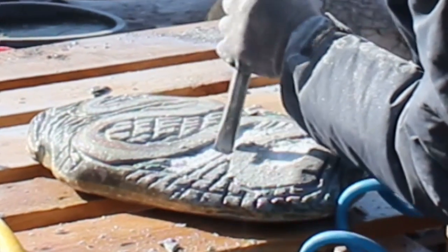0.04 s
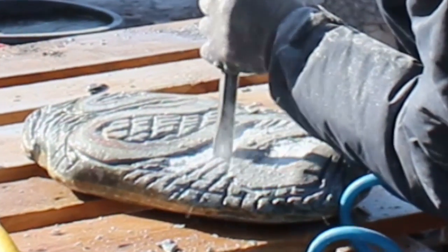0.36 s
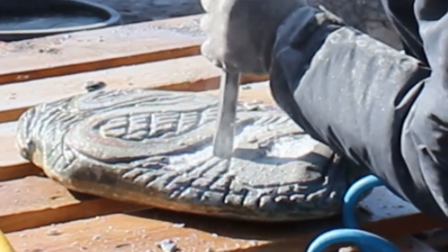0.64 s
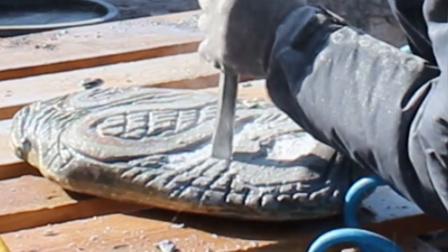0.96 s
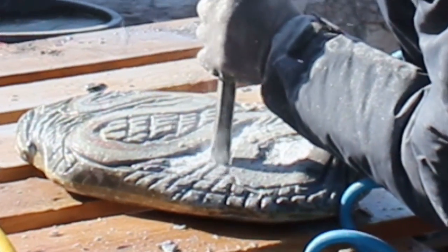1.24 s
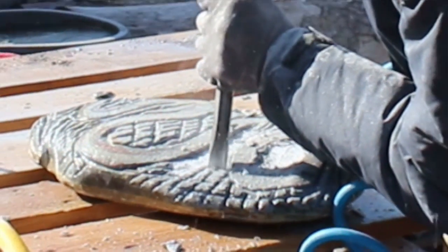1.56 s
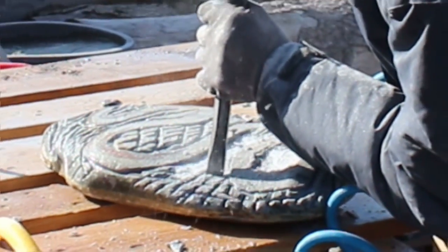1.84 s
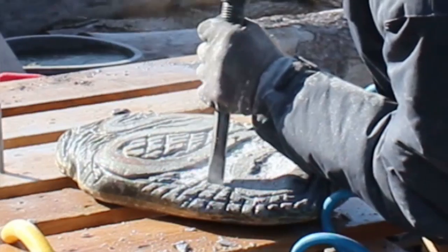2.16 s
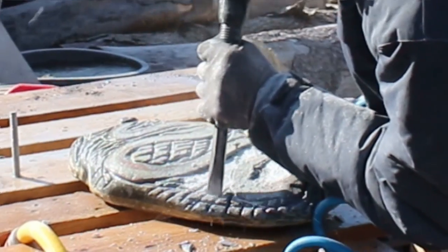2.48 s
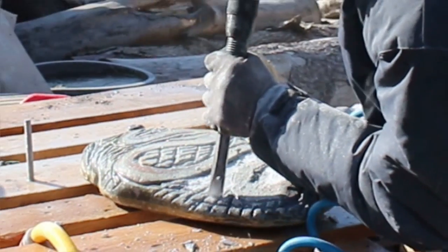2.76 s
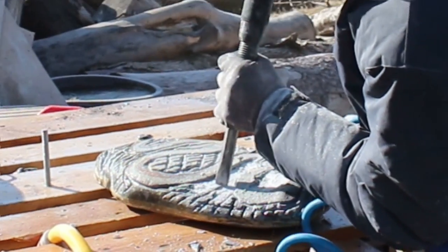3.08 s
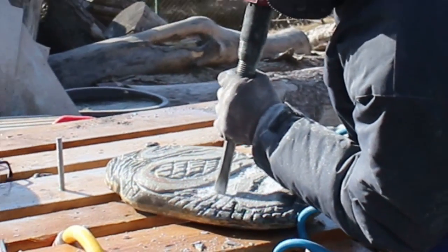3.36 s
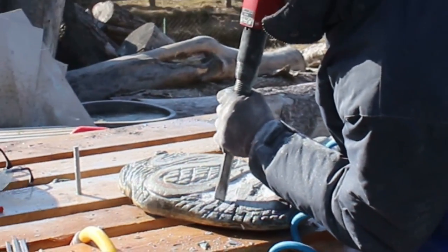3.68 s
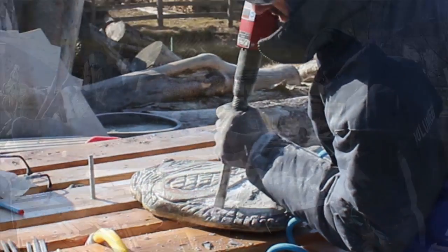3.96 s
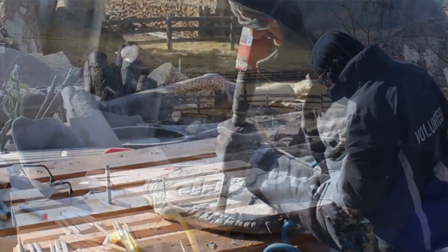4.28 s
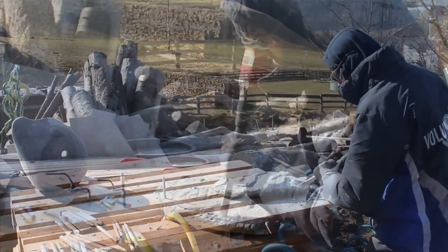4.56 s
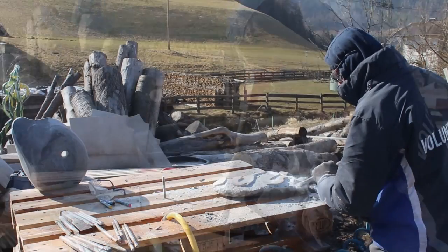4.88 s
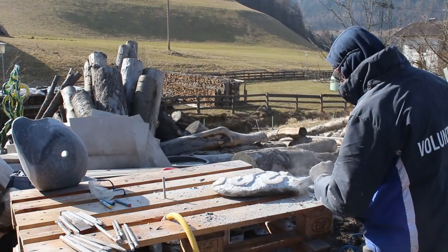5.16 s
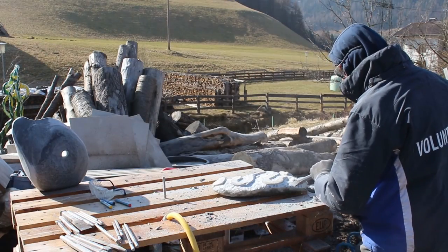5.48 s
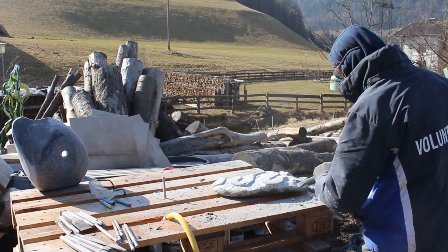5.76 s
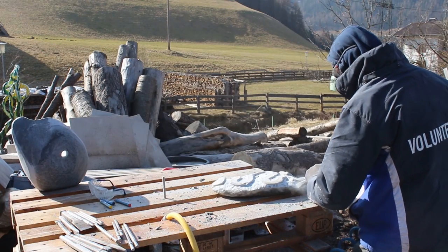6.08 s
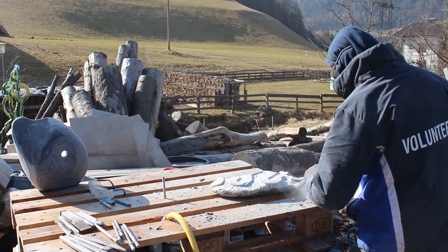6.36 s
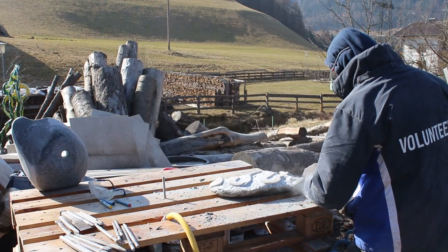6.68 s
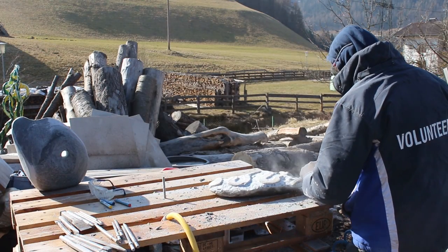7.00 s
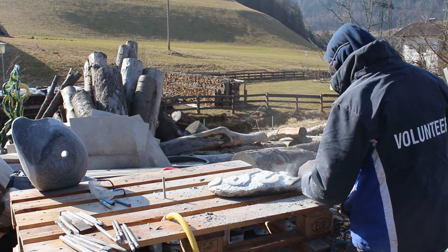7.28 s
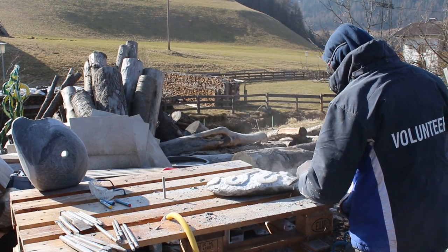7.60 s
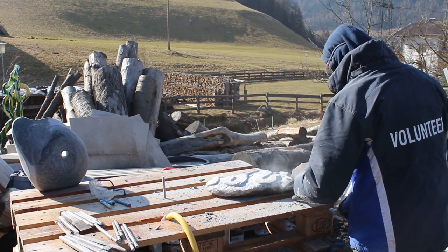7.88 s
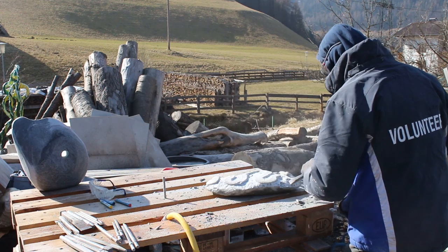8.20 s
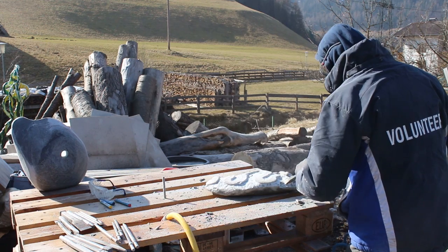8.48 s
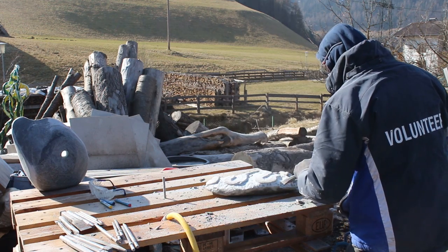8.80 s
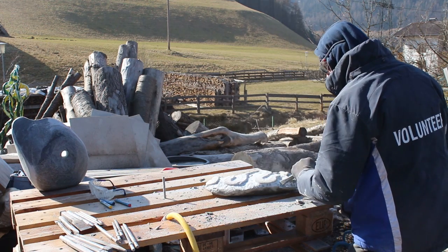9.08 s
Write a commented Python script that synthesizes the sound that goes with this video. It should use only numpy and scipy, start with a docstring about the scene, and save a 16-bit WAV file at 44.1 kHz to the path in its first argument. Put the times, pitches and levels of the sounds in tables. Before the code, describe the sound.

A pneumatic chisel hammers stone outdoors in a loud, rapid chatter, gritty with a metallic ring. Two long, crisp bursts sound close to the microphone while a compressor chugs faintly behind. The sound then blends into the same work heard from a little further off, with softer-edged bursts of different lengths. Small pops, air hisses, light ticks and faint wind on the microphone fill the short pauses.

```python
"""Carving stone with a pneumatic hammer

A sculptor works a stone on a pallet outdoors, close by at first, then from further off. Each piston
stroke puffs out a low thud, drives the ringing chisel into the stone a few ms later and vents again on
its way back. A compressor chugs behind the close spell; wind and small ticks fill the later pauses."""
import sys
import numpy as np
from scipy import signal
from scipy.fft import rfft, irfft, next_fast_len
from scipy.io import wavfile
from scipy.ndimage import uniform_filter1d

SR = 44100
rng = np.random.default_rng(int(sys.argv[2]) if len(sys.argv) > 2 else 0)


def put_to_file(sound):
    """Save the sound as 16-bit audio at rate SR, in the file named by the first command-line argument."""
    columns = np.atleast_2d(sound).T  # one column per channel
    safe = np.clip(columns, -1, 1)
    whole_steps = np.round(safe * 32767)
    wavfile.write(sys.argv[1], SR, whole_steps.astype(np.int16))


N = 403074
T = np.arange(N) / SR
AGE = np.arange(int(.1 * SR)) / SR  # time since a blow [s]
AGE_MS = AGE * 1000


def undb(db):
    """Decibels to gain."""
    return 10 ** (np.asarray(db) / 20)


def unit(x):
    """Scale to rms 1."""
    return x / np.sqrt(np.mean(x ** 2))


def per_stroke(sound):
    """Scale one stroke so that 25 of them a second have rms 1."""
    return sound * np.sqrt(SR / 25 / np.sum(np.abs(sound) ** 2))


def fader(rows):
    """A gain that rides through (time [s], level [dB]) points."""
    return undb(np.interp(T, *np.transpose(rows)))


def swell(s, db, rise_s, decay_s):
    """A gain that climbs to a peak at time s and dies away."""
    return undb(db) * np.exp(-np.maximum((s - T) / rise_s, (T - s) / decay_s))


def drift(rate):
    """A random wander of rms 1, turning about rate times a second."""
    hold = int(SR / rate)
    steps = np.repeat(rng.standard_normal(N // hold + 1), hold)
    return unit(uniform_filter1d(steps, hold)[:N])


def add(out, s, sound):
    """Mix a sound in at time s."""
    start = max(int(s * SR), 0)
    part = out[..., start:start + sound.shape[-1]]
    part += sound[..., :part.shape[-1]]


def band(x, low_hz, high_hz, order=3):
    """High-pass and low-pass in series."""
    high_pass = signal.butter(order, low_hz, "high", fs=SR, output="sos")
    low_pass = signal.butter(order, high_hz, fs=SR, output="sos")
    return signal.sosfilt(np.vstack([high_pass, low_pass]), x)


def eq_curve(colour, hz):
    """Gains at hz of a (frequency [Hz], level [dB]) colour."""
    points_hz, db = np.transpose(colour)
    return undb(np.interp(np.log(hz), np.log(points_hz), db))


def noise(colour, width=None):
    """Coloured stereo noise; width is the side gain, by default narrow in the bass and wider on top."""
    size = next_fast_len(N)
    hz = np.maximum(np.fft.rfftfreq(size, 1 / SR), 1)
    if width is None:
        width = 0.64 * np.minimum(hz / 4500, 1) ** 0.38
    roll_off = np.minimum(hz / colour[0][0], 1) ** 2 * np.minimum(colour[-1][0] / hz, 1) ** 4
    gain = eq_curve(colour, hz) * roll_off
    white = rfft(rng.standard_normal((2, size)))
    mid, side = irfft(white * [gain, gain * width], size)[:, :N]
    return np.array([mid + side, mid - side]) / mid.std()


def ring(times, gains, modes, width, scatter_db=2.5, wander_rad=0.8, rise_ms=0.87, bend_hz=0):
    """Modes struck anew by every blow; the contact varies their level and phase and can bend the pitch."""
    hz, t60, db = np.transpose(modes)[:, :, None]
    attack = 1 - np.exp(-AGE_MS / rise_ms)
    partials = undb(db) * np.exp((2j * np.pi * hz - np.log(1000) / t60) * AGE) * attack
    partials = per_stroke(partials) * np.sqrt(2)
    out = np.zeros((2, N))
    chance = rng.standard_normal((len(times), 3, len(modes)))
    for s, gain, bend, (size, wander, side) in zip(times, gains, bend_hz + 0 * times, chance):
        phase = wander_rad * wander + width * side * np.array([[1], [-1]])
        weights = gain * undb(scatter_db * size) * np.exp(1j * phase)
        add(out, s, (weights @ partials * np.exp(2j * np.pi * bend * AGE)).real)
    return out


def knocks(events, modes):
    """Single (time [s], level [dB]) blows on one set of modes."""
    times, db = np.transpose(events)
    return ring(times, undb(db), modes, width=.2, scatter_db=2.0, wander_rad=0.23)


def clack(times, gains, colour, decay_ms, rise_ms):
    """Crowded, heavily damped modes of a struck body: the same dry knock on every blow."""
    envelope = (1 - np.exp(-AGE_MS / rise_ms)) ** 2 * np.exp(-AGE_MS / decay_ms)
    knock = per_stroke(noise(colour)[:, :len(AGE)] * envelope) * np.sqrt(2)
    hits = np.bincount((times * SR).astype(int), gains, N)
    return signal.fftconvolve(hits[None, :N], knock, axes=1)[:, :N]


# The airy bed of the valley (frequency [Hz], level [dB])
VALLEY_COLOUR = [(100, -5.5), (400, -3), (800, -2.5), (1500, -9.5), (3000, -15.5), (6000, -26),
                 (10000, -38.5), (16000, -42.5)]


def valley():
    """The open valley lays a faint, steady hush under everything."""
    return undb(-54.5) * noise(VALLEY_COLOUR, width=0.57)


# The breeze and its short buffets (time [s], level [dB])
BREEZE = [(4.0, -55), (4.5, -52), (5.3, -50), (5.9, -49.5), (6.2, -44), (8.0, -55.5), (8.3, -45.5),
          (8.8, -48.5)]
BUFFETS = [(4.53, -39), (5.62, -46.5), (5.77, -47), (5.94, -45), (8.36, -40), (8.476, -39), (8.67, -41.5)]
# Their low rumble (frequency [Hz], level [dB])
WIND_COLOUR = [(12, -50.5), (20, -32.5), (57, -8.5), (128, -2), (147, -8), (162, -4.5), (203, -9.5),
               (400, -26.5), (520, -51), (880, -120)]


def wind(buffet_s=0.025):
    """Wind on the microphone: a wide rumble with quick bumps."""
    buffets = sum(swell(s, db, buffet_s, buffet_s) for s, db in BUFFETS)
    return (fader(BREEZE) + buffets) * noise(WIND_COLOUR, width=1.5)


# The dull tone of the yard's tail (frequency [Hz], level [dB])
YARD_COLOUR = [(130, 11), (500, 6.5), (1500, 7.0), (5000, 6.0), (14000, -68.5)]


def yard(x, t60=0.26, wet_db=-16.0, build_s=0.0051):
    """Wood piles and sheds scatter back a thin, short reverb."""
    t = T[:SR]
    tail = noise(YARD_COLOUR)[:, :SR] * undb(-60 * t / t60) * (1 - np.exp(-t / build_s))
    tail /= np.sqrt(np.sum(tail[0] ** 2))
    return undb(wet_db) * signal.fftconvolve(x, tail, axes=1)[:, :N]


# The compressor's fader ride (time [s], level [dB])
COMPRESSOR_RIDE = [(0, -27.5), (.2, -26), (.32, -30.5), (1.3, -35.5), (2.7, -36), (2.95, -33.5),
                   (3.2, -30.5), (3.35, -30.5), (4.0, -36.5), (4.8, -40.5), (5.2, -100)]
# Its rushing air, its boxy knock and the tones of its squeak (frequency [Hz], level [dB])
RUSH_COLOUR = [(24, -60), (40, -27), (75, -23.5), (107, -32.5), (139, -19), (202, -3), (309, -6.5),
               (890, -4), (1400, -14.5), (2560, -23.5), (3240, -17), (3910, -30), (4300, -29),
               (6870, -36.5), (8600, -34), (11000, -70), (14300, -119)]
HOUSING_COLOUR = [(120, -41), (160, 0), (210, 4), (310, -8), (640, -9), (860, -4), (1000, -11),
                  (1300, -19.5), (2200, -27)]
SQUEAKS = [(3220, -11), (1756, -13), (1545, -16.5), (4130, -21), (4441, -27), (8340, -20.5)]


def compressor(crank_hz=17.62, first_s=.0245, waver_hz=15, flutter_db=1.8):
    """Two pistons chug on each turn of the crank: the housing knocks, air rushes, a squeak wavers."""
    turns = (T - first_s) * crank_hz
    crank_phase, piston_phase = turns % 1, 2 * turns % 1
    beat_s = .5 / crank_hz
    beats = np.arange(first_s % beat_s, T[-1], beat_s)
    late, size = rng.standard_normal((len(beats), 2)).T
    housing = clack(beats + .0004 * late, undb(0.93 * size), HOUSING_COLOUR, decay_ms=13.5, rise_ms=2.7)
    chug = unit(0.5 + 1.2 * (1 - np.exp(-piston_phase / 0.064)) * np.exp(-piston_phase / 0.13))
    once_a_turn = unit(0.5 + np.exp(-crank_phase / .7) * (1 - np.exp(-crank_phase / 0.078)))
    tones = np.zeros(N)
    for hz, db in SQUEAKS:
        gain = undb(db + flutter_db * drift(45))
        pitch_hz = hz + waver_hz * (drift(14) + drift(160))
        tones += gain * np.sin(2 * np.pi * np.cumsum(pitch_hz) / SR)
    squeak = once_a_turn * unit(tones)
    rush = chug * noise(RUSH_COLOUR)
    return fader(COMPRESSOR_RIDE) * (undb(-1.5) * unit(housing) + undb(-4.0) * rush + undb(-16.5) * squeak)


# Little breaths of air (time [s], level [dB], rise [s], decay [s])
LEAKS = [(5.5, -52, .004, 0.12), (5.99, -40, 0.019, .01), (8.1, -45, .02, 0.054),
         (8.775, -40, 0.0097, 0.017)]
# Their hiss (frequency [Hz], level [dB])
LEAK_COLOUR = [(300, -2), (1000, 3), (2100, 2), (4000, 3), (5500, 5), (9000, 3), (12000, -16.5),
               (16000, -27)]


def valve_leaks():
    """Air slips past the half-open valve as the trigger moves."""
    return sum(swell(*leak) for leak in LEAKS) * noise(LEAK_COLOUR)


# Light ticks in the pauses (time [s], level [dB])
TOUCHES = [(5.698, -52), (8.434, -50.5)]
# What they set ringing (frequency [Hz], t60 [s], level [dB])
TOUCH_MODES = [(557, .05, 2), (1050, 0.023, 2), (2240, 0.075, -5), (3370, .02, -6)]


def chisel_touches():
    """The chisel tip ticks as it is set down on the stone."""
    return knocks(TOUCHES, TOUCH_MODES)


# Hollow pops (time [s], level [dB])
POPS = [(4.5015, -31.5), (4.566, -35), (4.6268, -33), (5.9708, -36), (8.7961, -28.5), (9.112, -44)]
# The barrel's resonances (frequency [Hz], t60 [s], level [dB])
BARREL_MODES = [(560, 0.051, 0), (665, 0.057, 6), (835, 0.029, -18)]


def barrel_pops():
    """The barrel pops as the piston starts to move."""
    return knocks(POPS, BARREL_MODES)


# Short, bright rasps (time [s], centre [Hz], level [dB])
SCRAPES = [(5.392, 7000, -34), (5.432, 5800, -27), (5.439, 5500, -25), (7.868, 8600, -27.5),
           (8.013, 8800, -27), (8.881, 9000, -27), (8.893, 8430, -36), (8.952, 8700, -31),
           (9.027, 8400, -29.5), (9.039, 8600, -36)]


def scrapes(rise_s=0.00082, decay_s=0.0076, edge_ratio=1.2):
    """The tip skids and flakes the stone: a flick of band-passed noise."""
    out = np.zeros((2, N))
    envelope = 2 * (1 - np.exp(-AGE / rise_s)) * np.exp(-AGE / decay_s)
    for s, hz, db in SCRAPES:
        rasp = band(rng.standard_normal((2, len(AGE))), hz / edge_ratio, hz * edge_ratio, order=2)
        add(out, s, undb(db) * unit(rasp) * envelope)
    return out


def thuds(times, gains, echoes, low_hz, high_hz, scatter_db=1.46, lead_ms=0.73):
    """The exhaust puff, one fast swing of pressure, with near reflections that vary as the tool shakes."""
    lag_ms, path_gain = np.vstack([(0, 1), echoes]).T
    lags = np.abs(lag_ms * SR / 1000).astype(int)
    swing = -band(signal.unit_impulse(len(AGE)), low_hz, high_hz)
    one_thud = signal.fftconvolve(np.bincount(lags, path_gain), swing)
    shake_db = scatter_db * rng.standard_normal((len(times), len(lags))) * np.minimum(lag_ms / 4, 1)
    sizes = gains[:, None] * path_gain * undb(shake_db)
    arrivals = ((times - lead_ms / 1000) * SR).astype(int)[:, None] + lags
    puffs = np.bincount(arrivals.ravel(), sizes.ravel(), N)[:N]
    return signal.fftconvolve(puffs, swing)[:N] * per_stroke(one_thud).max() / one_thud.max()


def grit(times, gains, bursts, colour, scatter_db, grain_db=3, jitter_ms=.12):
    """Bursts of air and crushed stone, grainy and each a little different from stroke to stroke."""
    power = np.zeros(N)
    envelopes = np.array([undb(db) * (1 - np.exp(-AGE_MS / rise)) * np.exp(-AGE_MS / decay)
                          for _, rise, decay, db in bursts])
    for (delay_ms, *_), envelope in zip(bursts, per_stroke(envelopes)):
        for s, gain, (size, late) in zip(times, gains, rng.standard_normal((len(times), 2))):
            onset = s + (delay_ms + jitter_ms * late) / 1000
            add(power, onset, (gain * undb(scatter_db * size) * envelope) ** 2)
    roughness = unit(uniform_filter1d(rng.standard_normal(N), size=48))
    return np.sqrt(power) * unit(undb(grain_db * roughness)) * noise(colour)


# The hard edge of the transient (frequency [Hz], level [dB])
SNAP_COLOUR = [(400, -27), (1200, -8.5), (1700, 0), (2500, -1.5), (3200, -13), (3900, -11), (4700, -2),
               (5400, -7), (7000, -22), (12000, -29)]


def snap(times, gains, size=512):
    """The bare click of steel on stone, the same on every blow."""
    hz = np.maximum(np.fft.rfftfreq(size, 1 / SR), 1)
    cepstrum = irfft(np.log(eq_curve(SNAP_COLOUR, hz)))
    click = irfft(np.exp(rfft(2 * cepstrum[:size // 2], size)))  # minimum phase keeps the attack tight
    hits = np.bincount((times * SR).astype(int), gains, N)
    return signal.fftconvolve(hits, per_stroke(click))[:N]


# A stroke has five layers: thud, grit, chisel ring, stone ring, chisel ping.
# Variation from stroke to stroke (scatter [dB] per layer)
STROKE_SCATTER_DB = (0.22, 0.15, 1.2, 0.99, 0.64)
# Accents where a chip breaks off (time [s], extra grit [dB])
CHIPS = [(.385, 1.5), (1.713, -3), (3.47, 2), (3.594, 2), (3.677, -1), (3.8, 3), (8.012, 3.5), (8.879, 2.5),
         (8.95, 0)]
# The stone gives way (time [s]), with more grit and less ring (offset [dB] per layer)
CRUMBLES = [5.317, 5.39, 5.426, 5.466, 7.865, 8.05, 8.95, 9.023]
CRUMBLE_DB = (-1, 1, -3, -6.5, -8)
# Trims on a loose blow's ring level (chisel ring [dB], stone ring [dB], chisel ping [dB])
LOOSE_RING_DB = (-4.5, -2, -7.5)


def strokes(pulls, surge, balance_db, seat, seat_share, loose, window_s=.015):
    """Rows of (time, five layer gains): the hose's surge sags after each pull, the seat sets the ring."""
    surge_db, surge_s, kick_db, kick_s = surge
    rows = []
    for force_db, drift_db, extra_db, tempo, last in pulls:
        ends = [s for s, _ in tempo[1:]] + [last]
        runs = [np.linspace(s, end, max(round((end - s) * rate), 1), endpoint=False)
                for (s, rate), end in zip(tempo, ends)]
        times = np.concatenate(runs + [[last]])
        age = times - times[0]
        boost_db = surge_db * np.exp(-age / surge_s) + kick_db * np.exp(-age / kick_s)
        db = (force_db + drift_db * age + boost_db)[:, None] + balance_db
        db += np.outer(np.interp(times, *np.transpose(seat)), seat_share)
        crumbling = np.abs(times[:, None] - CRUMBLES).min(axis=1) < window_s
        db += np.outer(crumbling, CRUMBLE_DB)
        db[:, -2:] += extra_db  # stone ring and chisel ping
        db[:, 1] += sum(chip_db * (np.abs(times - s) < window_s) for s, chip_db in CHIPS)
        db += STROKE_SCATTER_DB * rng.standard_normal(db.shape)
        rows += list(np.column_stack([times, undb(db)]))
    for s, thud_db, grit_db, ring_db in loose:
        rows.append([s, undb(thud_db), undb(grit_db), *undb(ring_db + np.array(LOOSE_RING_DB))])
    return np.array(rows)


# One sharp crack as the edge bites (delay [ms], rise [ms], decay [ms], level [dB])
CRACK_BURST = [(0, 0.1, 0.65, 0)]
# The dry knock of stone and tool body (frequency [Hz], level [dB])
CLACK_COLOUR = [(450, -23), (650, -1.5), (850, 6), (1200, -11.5), (1800, -1.5), (2600, -7.5), (3500, -22)]


def hammer(blows, echoes, bursts, grit_colour, crack_colour, modes, stone_bend, *, thud_hz, strike_ms,
           grit_scatter_db, pallet_db, pallet_ms, crack_db, snap_db, clack_db, clack_ms,
           chisel_rise_ms, stone_rise_ms, wobble_hz=15):
    """Each stroke thuds, then the piston lands with a crack; chisel, stone and pallet ring under grit."""
    times, thud, dust, chisel, stone, ping = blows.T
    chisel_modes, stone_modes, ping_modes, pallet_modes = modes
    landing = times + strike_ms / 1000
    out = thuds(times, thud, echoes, *thud_hz) + grit(times, dust, bursts, grit_colour, grit_scatter_db)
    bite = np.sqrt(dust * ping)  # sharpest on firm stone, where the steel pings too
    out += grit(landing, bite * undb(crack_db), CRACK_BURST, crack_colour, scatter_db=0, grain_db=1.0)
    out += snap(landing, bite * undb(snap_db))
    out += clack(landing, thud * undb(clack_db), CLACK_COLOUR, clack_ms, rise_ms=0.13)
    seated = dict(scatter_db=.8, wander_rad=.25)  # firmly seated, each blow rings much like the last
    rattle_hz = wobble_hz * rng.standard_normal(len(times))  # the chisel rattles in the hand
    shift_hz = np.interp(times, *np.transpose(stone_bend))
    out += ring(landing, chisel, chisel_modes, 0.22, rise_ms=chisel_rise_ms, bend_hz=rattle_hz, **seated)
    out += ring(landing, stone, stone_modes, 0.19, rise_ms=stone_rise_ms, bend_hz=shift_hz, **seated)
    out += ring(landing, ping, ping_modes, width=0.68, rise_ms=.2)
    # the slats answer every blow alike, which gives the chatter its pitched buzz
    return out + ring(times + pallet_ms / 1000, thud * undb(pallet_db), pallet_modes,
                      width=0.11, scatter_db=.5, wander_rad=0.092, rise_ms=4.2)


# Pulls of the trigger (force [dB], drift [dB/s], (extra stone ring [dB], extra ping [dB]),
# tempo as (from [s], rate [strokes/s]), last stroke [s])
FAR_PULLS = [(-36.5, 10, (0, 3), [(4.2058, 25), (4.286, 28.5), (4.3561, 24)], 4.398), (-29.5, 6, (-3.4, -1),
             [(4.675, 25.9), (4.7522, 26.9), (5.0495, 26.6), (5.1622, 25.8), (5.3172, 27.5), (5.426, 25)],
             5.4663), (-28, -0.34, (1.24, 1.2), [(6.016, 26.6), (6.0911, 27.1), (6.905, 26.7),
             (7.092, 27.1), (7.4978, 27.2), (7.8657, 29), (7.9, 26.6)], 8.0507), (-26.5, -8, (-1, 0),
             [(8.8415, 27.4), (8.8792, 28.1), (8.9859, 26.6)], 9.0235)]
# The full hose's opening punch (surge [dB], decay [s], first kick [dB], decay [s])
FAR_SURGE = (2.7, 0.35, 1.9, 0.058003)
# The mix of a stroke against its force (offset [dB] per layer)
FAR_BALANCE_DB = (0, -7.5, -14, -13, -13)
# How freely the chisel rings as the hand shifts its seat (time [s], level [dB]), and each layer's share
FAR_SEAT = [(4.2, 3.5), (4.7, -1.5), (5.15, 0), (5.35, -3), (6.016, -6), (6.054, 5), (6.28, 6.5),
            (6.32, 1.5), (6.39, 6), (6.74, -1), (6.95, 9.5), (7.13, -1.5), (7.3, 4.5), (7.8, 3), (7.9, -7),
            (7.98, -7), (8.012, 4), (8.06, 2), (8.85, -5), (9.02, -2)]
FAR_SEAT_SHARE = (-0.0024, 0.027, 0.93, 1, 0.019)
# Loose blows as the trigger opens or shuts (time [s], thud [dB], grit [dB], ring [dB])
FAR_LOOSE = [(4.4474, -33.5, -36, -43), (4.5018, -38, -42, -41), (4.6276, -34, -36, -42),
             (4.653, -37, -40, -46), (5.505, -66, -48, -56), (5.544, -51, -44, -61),
             (5.9716, -30.5, -39.5, -62), (5.994, -30.5, -37.5, -57), (8.0888, -34.5, -38, -40),
             (8.126, -63, -50, -48), (8.7964, -28.5, -36.5, -58), (8.8193, -32, -35.5, -50),
             (9.069, -35, -36.5, -38.5), (9.112, -60, -52, -55)]
# The thud off bench, stone, body and wood piles (delay [ms], gain: negative from the back of the tool)
FAR_ECHOES = [(0.346, 0.58), (2.85, -0.2), (4.36, 0.43), (5.59, -0.091), (7.2, 0.17), (10.2, 0.054),
              (12.4, 0.12), (15.5, -0.25), (18.2, -0.31)]
# Valve, crumbling chips, return vent and air leak (delay [ms], rise [ms], decay [ms], level [dB])
FAR_BURSTS = [(-1.4, 1.2, 2.4, -3.5), (2.3, 0.69, 2.9, -5.5), (14.8, 1.6, 4.3, -10),
              (-8.5, 1.78, 59, -16.5)]
# Colours of the grit and of the crack (frequency [Hz], level [dB])
FAR_GRIT = [(300, 11.5), (1050, 5.5), (1400, 4), (2500, 2.5), (3900, 1.5), (5000, 3), (6500, -1.5),
            (7300, -0.5), (9200, 0), (10500, -5.5), (12000, -3.5), (13700, -15), (14700, -26), (16000, -27)]
FAR_CRACK = [(600, -4), (1800, 11), (3900, -7), (5000, -6), (6300, -16), (7300, -1), (9400, 6), (11000, -2),
             (13800, -0.5), (16000, -23)]
# Four banks: chisel bending, stone, steel lengthwise, pallet (frequency [Hz], t60 [s], level [dB])
FAR_MODES = ([(2819, 0.039, -5.5), (2896, 0.033, 4), (2950, 0.048, -0.5), (3370, 0.037, -6)],
             [(1460, 0.024, -7.5), (1897, 0.023, -1.5), (2007, 0.034, -2.5), (2210, 0.052, 0)],
             [(12600, 0.028, -0.5), (12625, 0.11, -16), (13200, 0.0071, 0.5), (13550, 0.006, 4.5)],
             [(117, 0.18, -2), (218, 0.224, -6), (509.7, 0.18, 0.3), (706, 0.2, 1), (831.4, 0.054, 12.5),
             (965, 0.037, 1), (1237, 0.034, 13)])
# The stone's ring shifts as the tip bears on another spot (time [s], shift [Hz])
FAR_STONE_BEND = [(4.6, 30), (4.75, -280), (5.45, -320), (6.0, -14), (6.2, -2), (7.8, 5.5), (7.95, -110),
                  (8.15, -130), (8.85, -180), (9.1, -170)]


def far_carving():
    """Four pulls of the trigger from further off, with a softer crack and a slower bloom to the ring."""
    blows = strokes(FAR_PULLS, FAR_SURGE, FAR_BALANCE_DB, FAR_SEAT, FAR_SEAT_SHARE, FAR_LOOSE)
    return hammer(blows, FAR_ECHOES, FAR_BURSTS, FAR_GRIT, FAR_CRACK, FAR_MODES, FAR_STONE_BEND,
                  thud_hz=(189, 675), strike_ms=1.89, grit_scatter_db=0.5, pallet_db=-12, pallet_ms=2.616,
                  crack_db=-5, snap_db=-8, clack_db=-17.5, clack_ms=13,
                  chisel_rise_ms=3.3, stone_rise_ms=3.1)


# Pulls up close (force [dB], drift [dB/s], (extra stone ring [dB], extra ping [dB]),
# tempo as (from [s], rate [strokes/s]), last stroke [s])
CLOSE_PULLS = [(-31, 0.25, (0.28, 0), [(.261, 24.1), (1.0483, 24.2)], 2.8283), (-31.5, -1, (-0.91, -1),
               [(3.2631, 23.4), (3.3059, 24.2)], 4.5862)]
# Opening punch (surge [dB], decay [s], first kick [dB], decay [s])
CLOSE_SURGE = (6.4, 0.48, 0.5, .04)
# Stroke mix (offset [dB] per layer)
CLOSE_BALANCE_DB = (0, -4, -5.5, -11.5, -20.5)
# The seat opens and chokes the ring (time [s], level [dB]), and each layer's share
CLOSE_SEAT = [(.26, -19), (.58, -0.5), (1.3, -0.5), (1.59, 2), (1.63, 6.5), (1.795, 6), (1.835, -3),
              (2.085, -4), (2.125, 5), (2.21, -5), (2.25, -6), (2.29, 3), (2.335, 3.5), (2.375, -4),
              (2.5, -4.5), (2.83, 4), (3.26, -22), (3.55, 0), (4.05, -8), (4.5, 6)]
CLOSE_SEAT_SHARE = (0.0093, 0.091, 0.82, 0.62, 0.0013)
# Loose blows (time [s], thud [dB], grit [dB], ring [dB])
CLOSE_LOOSE = [(0.227, -28.5, -47.5, -54), (0.24, -38, -29.5, -49), (2.8708, -41.5, -43, -44),
               (3.228, -33.5, -40, -66)]
# Early reflections of the thud (delay [ms], gain)
CLOSE_ECHOES = [(0.475, 0.92), (3.29, -0.28), (4.12, -0.03), (5.09, 0.45), (6.49, -0.5), (10.5, 0.071),
                (13.4, 0.019), (19.7, 0.11)]
# Valve, chips, return vent and leak (delay [ms], rise [ms], decay [ms], level [dB])
CLOSE_BURSTS = [(-0.38, 0.38, 1, 6), (3, 0.26, 3.9, -5.5), (17, 1.7, 2.7, 1), (-7, 3.4, 51, -16.5)]
# Brighter grit and crack (frequency [Hz], level [dB])
CLOSE_GRIT = [(300, -8.5), (850, 5), (1300, 0), (2500, 7), (3900, -2.5), (4700, 6), (6200, -0.5), (7250, 3),
              (8000, 0), (8900, 3.5), (10900, -4.5), (13400, -5), (14400, -8), (16000, -22)]
CLOSE_CRACK = [(600, -7.5), (1700, 3), (2600, 2.5), (3900, -12), (4700, 5), (6200, -9.5), (7250, 5.5),
               (8900, 6.5), (11000, -2.5), (13400, 2.5), (16000, -18)]
# Chisel bending, stone, steel lengthwise, pallet (frequency [Hz], t60 [s], level [dB])
CLOSE_MODES = ([(2480, 0.019, -1), (2684, 0.018, 3), (2877, 0.029, 1.5), (2942, 0.024, 8.5),
               (3026, 0.04, -3), (3470, 0.024, -3)], [(1410, .07, -7.5), (1569, 0.067, 0.5),
               (1677, 0.028, 10.5), (2067, 0.12, 2), (2120, 0.051, 5.5), (2260, 0.066, 3),
               (4680, 0.025, -3)], [(12700, 0.036, 1), (13400, 0.012, -0.5)], [(225, 0.13, 5),
               (359, 0.12, -4.5), (556, 0.09, -1)])
# A slight bend in the stone's ring (time [s], shift [Hz])
CLOSE_STONE_BEND = [(2.8, 1.5), (3.3, -13.5)]


def close_carving(fade_from_s=4.14, fade_db_per_s=17):
    """Two long, crisp pulls right at the stone; the second fades as the far spell comes in."""
    blows = strokes(CLOSE_PULLS, CLOSE_SURGE, CLOSE_BALANCE_DB, CLOSE_SEAT, CLOSE_SEAT_SHARE, CLOSE_LOOSE)
    blows[:, 1:] *= undb(-fade_db_per_s * np.maximum(blows[:, :1] - fade_from_s, 0))
    return hammer(blows, CLOSE_ECHOES, CLOSE_BURSTS, CLOSE_GRIT, CLOSE_CRACK, CLOSE_MODES,
                  CLOSE_STONE_BEND, thud_hz=(217, 826), strike_ms=2.95, grit_scatter_db=1.0,
                  pallet_db=-9, pallet_ms=2.45, crack_db=1.5, snap_db=-4, clack_db=-19.5, clack_ms=7.4,
                  chisel_rise_ms=2.2, stone_rise_ms=1.0)


def scene(left_db=2.5):
    """Carving and compressor sit a little to the left, with the open air all around."""
    tool = close_carving() + far_carving() + barrel_pops() + scrapes()
    pan = undb(np.array([[left_db], [-left_db]]) / 2)
    work = (tool + yard(tool) + compressor()) * pan
    return work + wind() + valve_leaks() + valley() + chisel_touches()


def record(dry, top_hz=16100):
    """A steep low-pass trims the very top."""
    return signal.sosfilt(signal.ellip(10, .2, 80, top_hz, fs=SR, output="sos"), dry)


dry = scene()
out = record(dry)
put_to_file(out)
```